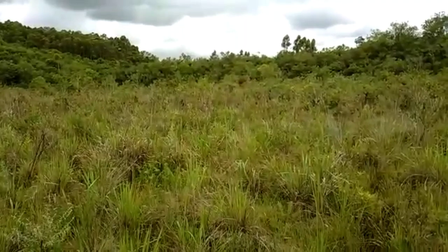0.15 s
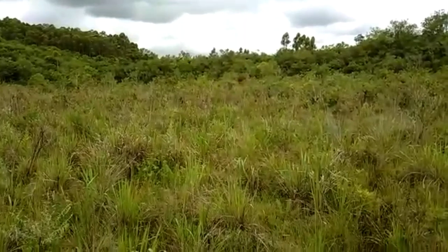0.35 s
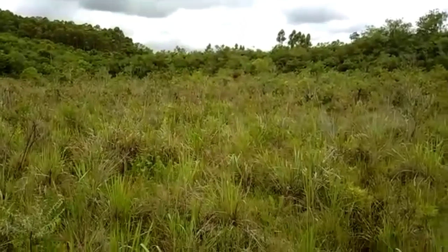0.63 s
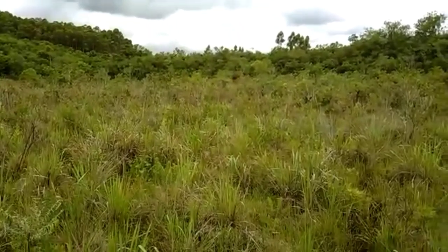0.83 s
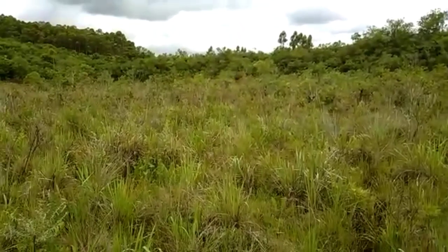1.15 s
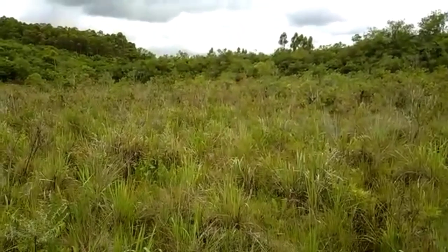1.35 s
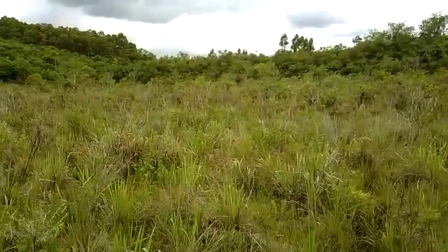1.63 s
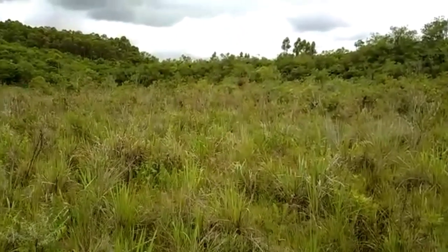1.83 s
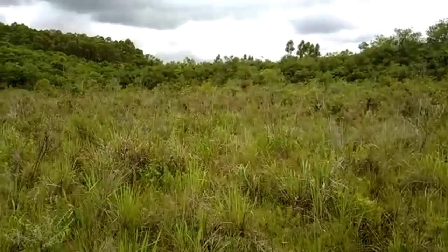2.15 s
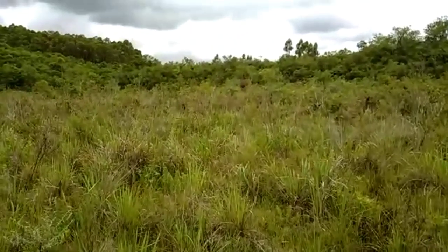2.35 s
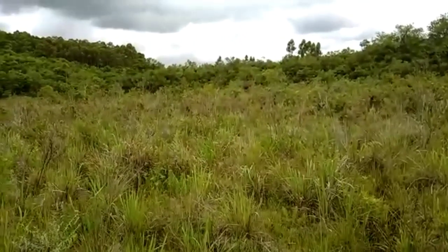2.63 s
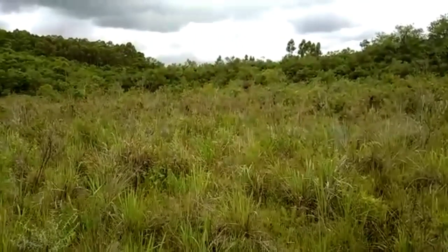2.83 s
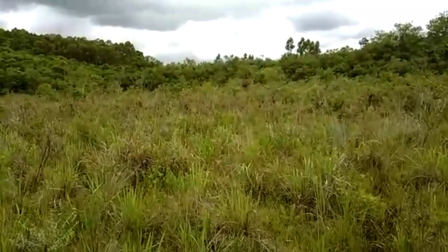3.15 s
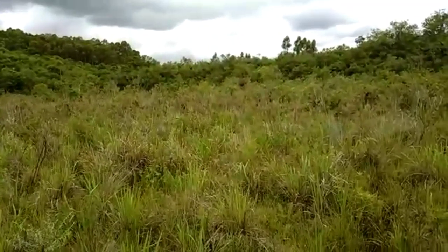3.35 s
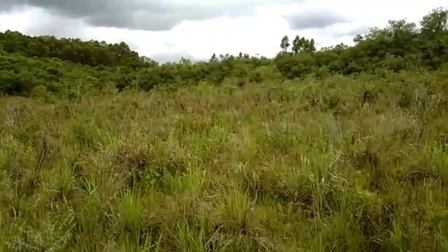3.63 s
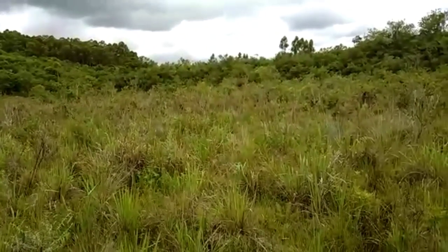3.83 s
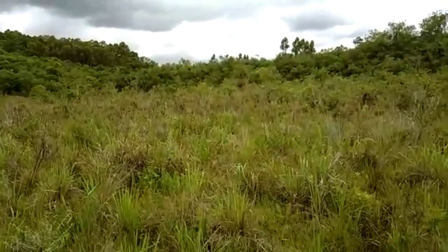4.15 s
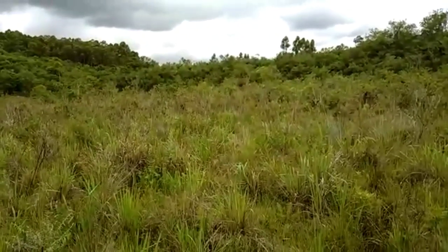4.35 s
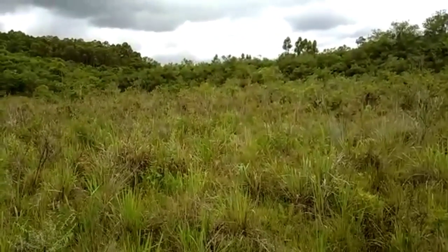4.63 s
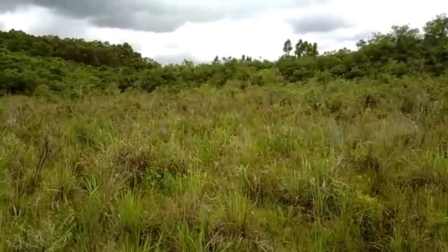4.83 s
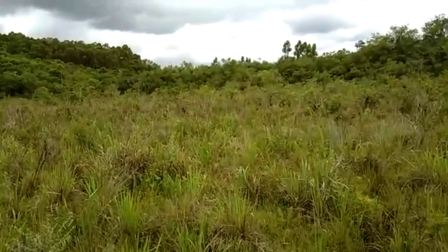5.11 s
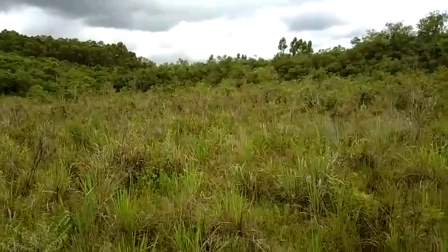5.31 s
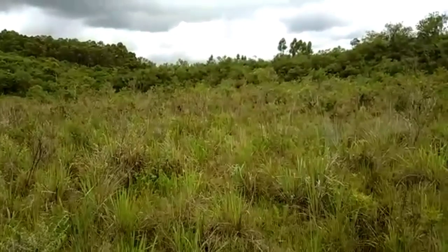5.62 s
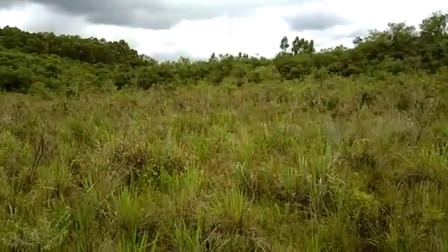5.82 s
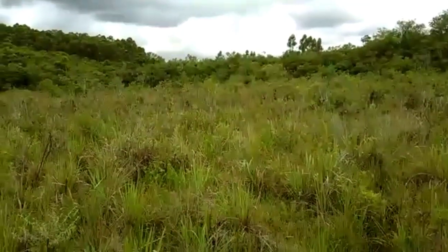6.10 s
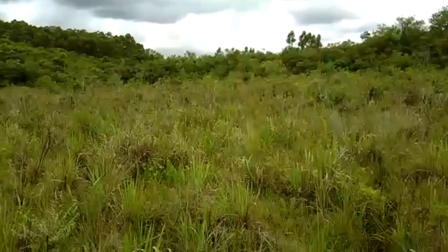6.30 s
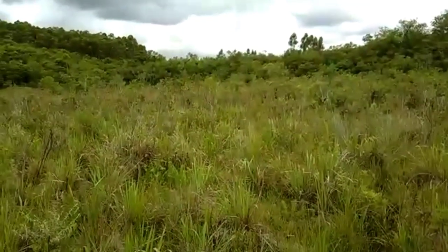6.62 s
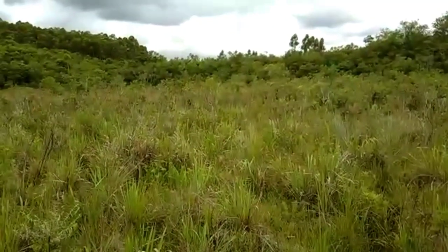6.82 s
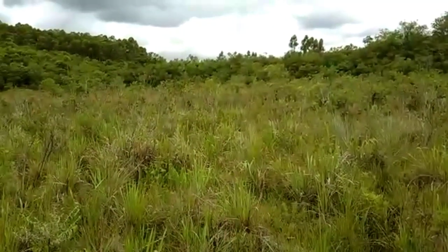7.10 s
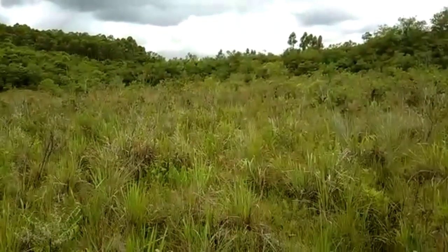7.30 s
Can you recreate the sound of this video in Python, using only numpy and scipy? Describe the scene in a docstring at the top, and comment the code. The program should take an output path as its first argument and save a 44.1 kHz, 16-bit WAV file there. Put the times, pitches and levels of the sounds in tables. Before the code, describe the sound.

Hounds bay some way off with long overlapping howls, hoarse cries and short yelps, over faint insects in an open field.

```python
"""Hounds bay some way off in a grassy valley whose wooded slopes return a faint echo.
One howl is already under way. After a second, barks and yelps open long overlapping bays, which break
into a hoarse rasp and drop in pitch as the breath runs out. After a short lull, at 4 s, come a hoarse cry
and a long howl; thinner cries follow from 6 s to the end. All along, an insect scrapes its wings nearby
in even pulses, and now and then a small bird chirps and the grass stirs."""
import sys
import numpy as np
from scipy import signal
from scipy.fft import rfft, irfft
from scipy.io import wavfile
from scipy.ndimage import uniform_filter1d

SR = 44100
rng = np.random.default_rng(int(sys.argv[2]) if len(sys.argv) > 2 else 0)


def unload_audio(sound):
    """Save the sound as a 16-bit wav file, at the path given as the first command line argument."""
    columns = np.transpose(np.atleast_2d(sound))
    # keep every value between -1 and 1, then stretch to whole-number steps
    steps = np.round(np.clip(columns, -1, 1) * 32767)
    wavfile.write(sys.argv[1], SR, steps.astype(np.int16))


N = 328986
T = np.arange(N) / SR
FREQS = np.fft.rfftfreq(N, 1 / SR)


# The long calls: (name, throat, kind of opening, start [s], end [s], opening pitch swing [Hz],
#   opening accent [dB], time the voice stays pinched [s], closing length [s], closing fall [share of
#   pitch], closing accent [dB], closing rasp over tone [dB], clear-voice rasp over tone [dB])
CALLS = [ ("first howl", "deep", "moan", -.5, 1.28, 0, 0, .01, 0.0506, .24, 4.4, -2, -34),
         ("main bay", "deep", "bark", 1.246, 3.612, -85, -1, .01, .0305, .25, -2, -2, -27),
         ("first yelp", "deep", "yelp", 1.32, 1.485, 0, 0, 0.39, 0.015, .07, -3, -1, -25),
         ("second bay", "deep", "bark", 1.738, 3.735, -105, 10.6, .01, .052, 0.604, 3, -18, -25),
         ("second cry", "shrill", "yelp", 1.926, 3.08, 22.9, .44, 0.26, .02, .08, -3, -3, -17),
         ("hoarse cry", "shrill", "yelp", 3.983, 4.9, 62, 0, 0.14, .01, .04, 0, 0, -29),
         ("long howl", "deep", "moan", 4.224, 6.348, -62, 6.5, .01, 0.033, .13, 0, 3, -28.5),
         ("thin cry", "shrill", "yelp", 5.975, 7.6, 48.1, 5.3, 0.31, .01, .04, 0, 0, -23),
         ("rising cry", "shrill", "moan", 6.412, 7.11, 0, 0, .01, .01, .04, 0, 0, -17),
         ("gruff cry", "shrill", "moan", 7.24, 7.6, 0, 1, .01, .01, .04, 0, 0, -7),
         ("last howl", "deep", "yelp", 7.195, 7.42, -12, 0, 0.34, .03, .12, -3, -10, -13.5), ]
# The tone carries little below its lowest note or above its top resonance: (frequency [Hz], gain [dB])
TONE_FILTER = [(150, -10), (330, -10), (430, 0.5), (1900, 0.5), (2250, -0.5), (2700, -14)]
def hound(throat):
    """All calls of the "deep" or "shrill" hound: a clear tone, plus pulses that ring in its throat."""
    tone, pulses = sum(howl(call) for call in CALLS if call[1] == throat)
    pulses = pulses + rattles(throat)
    if throat == "shrill":
        pulses = pulses + voice_cracks()
    return equalise(tone, TONE_FILTER) + throat_rasp(pulses, throat)


# Harmonics 1-6 (whole multiples of the pitch) of an open bark, a round howl, a pinched yelp: (level [dB])
BARK_DB = [-14, 1, -9.5, -11, -23, -38]
HOWL_DB = [-9.5, 2.5, -22.5, -32.5, -75, -30]
YELP_DB = [2, -15, -15, -17, -33, -46]
# The mouth shifts, and its resonance lifts or drops the harmonic that lies in it:
# (call, time [s], half length [s], resonance [Hz], lift [dB])
MOUTH_SHIFTS = [("first howl", 0.53, 0.4, 1330, 3.8), ("first yelp", 1.365, .035, 1520, 7.6),
                ("first yelp", 1.408, .035, 2350, 23.7), ("second cry", 2.018, 0.025, 1400, 15),
                ("second cry", 2.02, 0.023, 2340, 14), ("second cry", 2.13, 0.15, 1980, 7.9),
                ("second cry", 2.64, 0.16, 1980, 16), ("main bay", 3.47, 0.078, 1400, 9.3),
                ("second bay", 3.62, 0.11, 1780, 21), ("hoarse cry", 4.025, 0.031, 1380, 13),
                ("long howl", 5.4, .5, 440, -3), ("thin cry", 6.003, 0.027, 1380, 12.3),
                ("thin cry", 5.995, .02, 1850, 7.9), ("thin cry", 6.754, 0.49, 1380, 19.6),
                ("thin cry", 7.28, 0.23, 1400, 10)]
# How uneven the rasp's slaps are, by throat: (slow wander [gaps], jitter [gaps], strength spread [0-1])
SLAP_UNEVENNESS = {"deep": (0.051, 0.031, 0.26), "shrill": (.03, .012, 0.16)}
def howl(call, quaver_hz=8.6, crest_s=2.29, mouth_width_hz=290, cycles_per_slap=2.5, edge_s=.0099):
    """One call as two rows: a tone, and a rasp of uneven slaps, one every second or third cycle."""
    name, throat, _, start, end, *_ = call
    sounding = gate(max(start, edge_s / 2), min(end, T[-1] - edge_s / 2), edge_s)
    on = sounding > 0
    t, tone, out = T[on], 0, np.zeros((2, N))
    pitch, tone_db, rasp_db, voice = call_shape(call, t)
    hoarse = 1 / (1 + from_db(tone_db - rasp_db))   # the rasp's share also shakes pitch and level
    waver = .004 * drift(35, t)
    quaver = .026 * np.cos(2 * np.pi * quaver_hz * (t - crest_s))
    shake = quaver + .012 * drift(130, t) + .012 * drift(14, t)
    cycles = np.cumsum(pitch * (1 + waver + hoarse * shake)) / SR
    for k, levels_db in enumerate(zip(BARK_DB, HOWL_DB, YELP_DB), 1):
        flicker_db = 1.5 * (drift(45, t) + drift(7, t)) * (k > 2)   # high harmonics are less steady
        if k == 1:   # the lowest one sways, and weakens as the voice gets hoarse
            flicker_db = 1.5 * drift(9, t) - .5 * hoarse
        lift_db = sum(db * bump(t, s, length) * bump(k * pitch, hz, mouth_width_hz)
                      for who, s, length, hz, db in MOUTH_SHIFTS if who == name)
        strength = np.interp(voice, [-1, 0, 1], from_db(levels_db))
        tone = tone + strength * from_db(flicker_db + lift_db) * np.cos(2 * np.pi * k * cycles)
    out[0, on] = tone * from_db(tone_db + .7 * drift(18, t) + 3.5 * hoarse * drift(110, t))
    wander, jitter, spread = SLAP_UNEVENNESS[throat]
    slaps = cycles / cycles_per_slap
    slaps = slaps + .13 * np.cos(np.pi * slaps)   # short and long gaps take turns
    slaps = slaps + wander * drift(40, t) + jitter * drift(170, t)
    out[1, on] = fold_clicks(slaps, spread) * from_db(rasp_db)
    return sounding * out


# Ways to open a call: (time of widest swing [s], half length [s], open muzzle [0-1], rasp over tone [dB])
OPENINGS = {"bark": (.004, .045, .85, -4), "moan": (.02, .032, .5, -8), "yelp": (.012, .03, 0, -25)}
# The held part of each call: (time [s], pitch [Hz], effort [dB])
HELD_NOTES = { "first howl": [(0, 446.6, -37.5), (.18, 437, -39.5), (.28, 446.7, -37.5), (.65, 456.5, -38),
              (1.0, 457, -40), (1.17, 458, -42), (1.22, 457.4, -44.5)], "main bay": [(1.28, 444.3, -35),
              (1.35, 441, -33), (1.4, 449, -33), (1.44, 456.1, -31.5), (1.7, 444.1, -34),
              (1.85, 449.8, -32), (2.21, 457.4, -31.5), (2.4, 463.6, -27.5), (2.85, 463.4, -29.5),
              (3.36, 467.1, -29), (3.45, 455.8, -34), (3.56, 442.7, -35)],
              "first yelp": [(1.325, 489.4, -38), (1.35, 516.4, -35.5), (1.38, 496, -29.5),
              (1.405, 470, -34.5), (1.435, 451, -35), (1.47, 483, -36)], "second bay": [(1.79, 440, -42.5),
              (1.85, 431.1, -42), (2.05, 433, -34.5), (2.28, 444, -36), (2.48, 432, -41),
              (2.74, 434.1, -37.5), (2.87, 456.2, -39), (3.42, 465, -36.5), (3.53, 458, -40.5),
              (3.62, 438, -45)], "second cry": [(1.95, 483.8, -31), (1.985, 478.2, -31), (2.05, 459, -34),
              (2.11, 497, -32.5), (2.16, 493.4, -29.5), (2.2, 474, -34), (2.27, 472, -37),
              (2.65, 476.9, -35), (2.75, 480.2, -38), (2.82, 501, -37.5), (3.02, 500, -39),
              (3.07, 480, -46)], "hoarse cry": [(4.0, 425, -38), (4.066, 422.5, -38), (4.12, 438.3, -36),
              (4.165, 478, -36.5), (4.24, 502, -36.5), (4.33, 470, -41.5), (4.62, 467.8, -43),
              (4.89, 451, -47.5)], "long howl": [(4.28, 426.4, -36), (4.45, 433, -36), (4.6, 446, -32.5),
              (4.75, 435.8, -36.5), (5.03, 431.3, -37.5), (5.26, 443.4, -35.5), (5.47, 450.8, -35),
              (5.7, 444.7, -36.5), (6.22, 441.8, -35), (6.32, 449.2, -36)], "thin cry": [(6.04, 417, -42),
              (6.2, 441.6, -40.5), (6.39, 447, -42.5), (6.47, 449, -54), (6.6, 452, -55),
              (6.85, 457.3, -50), (7.04, 468, -46.5), (7.2, 457, -45), (7.33, 464, -48), (7.46, 461, -49)],
              "rising cry": [(6.42, 444.8, -41), (6.47, 472, -40.5), (6.52, 503, -37.5),
              (6.575, 514, -38.5), (6.62, 526.4, -46), (6.69, 531, -46), (6.76, 506, -58), (6.83, 485, -41),
              (6.9, 475, -42), (6.96, 453, -44), (7.1, 447, -48.5)], "gruff cry": [(7.25, 470, -43),
              (7.35, 514, -41.5), (7.46, 531, -41.5)], "last howl": [(7.21, 451.7, -43.5),
              (7.28, 463.7, -43), (7.35, 470, -40), (7.4, 468, -45)], }
# Spells when the voice breaks into a rasp: (call, start [s], end [s], rasp over tone [dB])
HOARSE_SPELLS = [("first howl", -.1, 0.291, -21), ("first yelp", 1.32, 1.365, -4.5),
                 ("main bay", 1.413, 1.7, -7.5), ("main bay", 2.222, 3.42, -5.5),
                 ("second cry", 2.24, 3.1, -3), ("second bay", 2.4, 3.1, -8), ("second bay", 3.1, 3.45, 1),
                 ("hoarse cry", 4.168, 4.9, 4), ("long howl", 4.225, 4.275, -5),
                 ("long howl", 4.325, 4.815, -4), ("rising cry", 6.415, 7.11, 0),
                 ("gruff cry", 7.245, 7.6, 5.4)]
# How pinched each call stays while held: (pinch [0 round howl, 1 yelp])
HELD_PINCH = {"first howl": 0.12, "main bay": 0.082, "first yelp": .07, "second bay": .14, "second cry": .2,
              "hoarse cry": .2, "long howl": 0.018, "thin cry": 0.38, "rising cry": .12, "gruff cry": 0.33,
              "last howl": .07}
def call_shape(call, t, break_db=-12, jump_hz=21, jump_db=2.16, attack_s=.016):
    """How a call opens, holds and closes: pitch, tone level, rasp level, voice (-1 bark, 0 howl, 1 yelp)."""
    name, _, kind, start, end, swing_hz, accent_db, pinch_s = call[:8]
    close_s, close_fall, close_db, close_rasp_db, clear_rasp_db = call[8:]
    swing_at, swing_s, muzzle, opening_rasp_db = OPENINGS[kind]
    times, held_hz, effort_db = np.transpose(HELD_NOTES[name])
    age = t - start
    opening = bump(age, swing_at, swing_s)
    closing = np.clip(1 + (t - end) / close_s, 0, 1)
    slack = np.minimum(3 * closing, 1)
    spells = sum(from_db(db) * gate(a, b, edge=.016, t=t)
                 for who, a, b, db in HOARSE_SPELLS if who == name)
    # Once the rasp passes break_db, the voice jumps up and gets louder.
    broken = spells ** 2 / (spells ** 2 + from_db(break_db) ** 2)
    pitch = np.interp(t, times, held_hz) + swing_hz * opening + jump_hz * broken
    pitch = pitch * (1 - close_fall * closing ** 2)
    onset_db = accent_db * bump(age, .034, .018) - 13 * np.maximum(1 - age / attack_s, 0)
    ending_db = close_db * slack - 11.5 * closing ** 3   # the voice fades as its pitch drops
    level_db = np.interp(t, times, effort_db) + jump_db * broken + onset_db + ending_db
    rasp = from_db(clear_rasp_db) + from_db(opening_rasp_db) * opening + from_db(close_rasp_db) * slack
    rasp = np.maximum(spells, rasp)
    tone_db = level_db - 10 * np.log10(1 + rasp ** 2)   # tone and rasp share the effort
    pinch = np.maximum(HELD_PINCH[name] * (1 - broken / 2), np.exp(-(age / pinch_s) ** 4))
    gape = np.clip(muzzle * (opening + slack), 0, 1)
    return pitch, tone_db, tone_db + 20 * np.log10(rasp), pinch * (1 - gape) - gape


# Throat and open muzzle of each hound when hoarse: (frequency [Hz], relative level [dB])
THROATS = { "deep": [(100, -46), (185, -33), (250, -20), (300, -28.5), (345, -29.5), (460, -4), (560, -10),
           (675, 2), (810, -7.5), (960, -1), (1120, 1), (1260, -12.5), (1450, -15.5), (1700, -25.5),
           (1950, -19), (2300, -49)], "shrill": [(100, -41.5), (260, -18), (360, -27.5), (470, -10.5),
           (610, -2), (790, -20.5), (950, -2), (1080, 2), (1200, -0.5), (1280, -15), (1380, -12),
           (1600, -21.5), (1970, -13), (2270, -46), (4000, -50)], }
# The high part of the rasp: (frequency [Hz], gain [dB])
TREBLE_BAND = [(1300, -30), (1700, 0.5)]
# How that part rises and falls: (time [s], gain [dB])
TREBLE_LEVEL = [(0, 1), (1.5, -2), (2.3, -0.5), (2.45, 0), (2.62, 3.5), (2.78, -4), (2.95, -7), (3.35, -2),
                (4.25, -3), (4.8, -2.5), (5.3, -1), (6.45, -1), (6.7, 1), (6.92, 2), (7.4, -2)]
def throat_rasp(pulses, throat):
    """Each pulse rings in the throat and muzzle; the rasp grows brighter and duller over time."""
    rasp = colour(pulses, THROATS[throat])
    return rasp + equalise(rasp, TREBLE_BAND) * (from_db(at_time(TREBLE_LEVEL)) - 1)


# Rattles: (throat, start [s], end [s], first rate [1/s], last rate [1/s], limp [gaps], level [dB])
RATTLES = [("deep", 0, .12, 151, 148, 0, -45), ("shrill", 6.585, 6.715, 180, 184, .09, -40.5),
           ("shrill", 6.71, 6.815, 151.5, 150.5, 0, -40.5)]
def rattles(throat):
    """The vocal folds lock into a slow, regular rattle; a limp makes its gaps short and long in turn."""
    out = 0
    for who, start, end, first_rate, last_rate, limp, db in RATTLES:
        if who == throat:
            cycles = np.cumsum(np.interp(T, [start, end], [first_rate, last_rate])) / SR
            clicks = fold_clicks(cycles + limp * np.cos(np.pi * cycles), uneven=.036)
            out = out + from_db(db) * gate(start, end, edge=.013) * clicks
    return out


# Cracks in the shrill voice: (start [s], end [s], level [dB])
CRACKS = [(4.83, 4.882, -44), (4.915, 4.963, -45), (4.98, 5.017, -46), (5.06, 5.097, -47),
          (5.135, 5.156, -45), (5.225, 5.239, -43.5), (5.305, 5.32, -50), (5.385, 5.405, -50),
          (7.066, 7.08, -48.5), (7.118, 7.13, -43.5)]
def voice_cracks(clicks_per_s=215):
    """The voice cracks for a moment into ragged clicks."""
    cracking = sum(from_db(db) * gate(start, end, edge=.0086) for start, end, db in CRACKS)
    return cracking * fold_clicks(T * clicks_per_s + .169 * drift(150), uneven=.57)


def fold_clicks(cycles, uneven):
    """The vocal folds snap shut: one click per cycle, each with its own strength."""
    at = np.flatnonzero(np.diff(np.floor(cycles)) > 0)
    clicks = np.zeros(len(cycles))
    clicks[at] = 1 + uneven * (rng.exponential(size=8192)[:len(at)] - 1)
    return rms_one(clicks)


# Short yips and barks: (start [s], end [s], first pitch [Hz], last pitch [Hz], first mouth resonance [Hz],
#   last mouth resonance [Hz], chest tone against that resonance [dB], roughness [0-1], level [dB])
YIPS = [ (.325, .4, 468, 449, 1750, 1850, -16, .9, -60), (.932, .975, 489, 440, 1950, 1750, -16, 0.55, -62),
        (1.228, 1.261, 476, 446, 1450, 1350, 1, 0.34, -39),
        (1.254, 1.296, 362.4, 398, 1100, 1190, -18.5, 0.3, -34.5),
        (1.466, 1.54, 652, 567, 1330, 1170, -5, .15, -40.5),
        (1.543, 1.574, 362.6, 334, 720, 680, -24, 0.3, -34.5),
        (1.56, 1.619, 299, 160, 300, 150, 0, .5, -59), (1.75, 1.79, 334, 392, 1330, 1530, -21, .2, -38),
        (3.108, 3.152, 1055, 916, 1550, 1900, 6, .1, -26.5),
        (3.148, 3.191, 899.6, 832, 1740, 1590, 9, .35, -31.5),
        (3.146, 3.213, 546, 387, 1640, 1160, -9, .5, -38.5),
        (3.583, 3.61, 405.4, 335, 1230, 1020, -12, .15, -38.5),
        (5.495, 5.536, 390, 361.7, 400, 350, 0, .4, -55), (7.15, 7.18, 590, 547, 1750, 1797, 10, 0.66, -32),
        (7.172, 7.205, 808, 784, 1620, 1600, 0, .5, -38), ]
def yip(row, mouth_width_hz=380, edge_s=.011):
    """Sliding harmonics pass through a moving mouth; roughness shakes them and adds tones in between."""
    start, end, first_hz, last_hz, mouth_from_hz, mouth_to_hz, chest_db, rough, db = row
    on = (T > start) & (T < end)
    t, tone, out = T[on], 0, np.zeros(N)
    along = (t - start) / (end - start)
    pitch = first_hz + (last_hz - first_hz) * along ** 1.61   # slides ever faster
    mouth_hz = mouth_from_hz + (mouth_to_hz - mouth_from_hz) * along
    cycles = np.cumsum(pitch * (1 + rough * .073 * drift(500, t))) / SR
    for k in range(1, 7):
        gain = 1 / (1 + (2 * (k * pitch - mouth_hz) / mouth_width_hz) ** 2) ** 1.33
        growl = 1 + rough * .64 * drift(150, t) * np.cos(np.pi * cycles)   # at half the pitch
        tone = tone + (gain * growl + from_db(chest_db) * (k == 1)) * np.cos(2 * np.pi * k * cycles)
    envelope = np.sin(np.pi / 2 * np.minimum(np.minimum(t - start, end - t) / edge_s, 1))
    shimmer = from_db(rough * 5 * drift(250, t))
    out[on] = from_db(db) * envelope * rms_one(tone * shimmer)
    return out


# Where the pack is: (time [s], left over right [dB])
BEARING = [(0, 7), (1.85, 5), (2.8, 5), (4.0, 4.5), (4.9, 2), (5.88, 0), (6.13, 3), (7.46, 4.5)]
# How much of that left-right contrast is kept: (frequency [Hz], gain [dB])
SHADE = [(450, -7), (900, 1)]
# How late the sound reaches the left side: (time [s], delay [s])
LEFT_DELAY = [(0, 0), (2.7, 0.00012), (3.3, 0.00011), (4.2, 0.00011), (4.7, 0.000042), (6.9, 0),
              (7.3, 0.00012)]
def direction(x):
    """Sound from one side reaches left and right at unequal times and, mostly in the treble, levels."""
    left, right = x * pan(at_time(BEARING))
    mid = (left + right) / 2
    side = equalise((left - right) / 2, SHADE)
    late_left = np.interp(T - at_time(LEFT_DELAY), T, mid + side)
    return np.array([late_left, mid - side])


def valley_echo(x, bush_db=-17, bush_fade_s=.12, slope_db=-23, slope_fade_s=2.6, slope_delay_s=.16):
    """Nearby bushes scatter the calls; the far slopes send back a long, faint wash."""
    t = T[:2 * SR]
    near, far = rng.standard_normal((2, 2, len(t)))
    near = near * from_db(-60 * t / bush_fade_s) * (t > .004)
    far = far * from_db(-60 * t / slope_fade_s) * (t > slope_delay_s)
    response = (from_db(bush_db) * rms_one(near) + from_db(slope_db) * rms_one(far)) / np.sqrt(len(t))
    return signal.fftconvolve(x[None], response, axes=1)[:, :N]


# Runs of even wing strokes: (first stroke [s], end [s], time between strokes [s], level [dB])
INSECT_RUNS = [(.2, .8, 0.23, -69), (1.05, 2.2, 0.3, -66), (2.352, 3.5, .254, -57),
               (3.629, 4.62, 0.2244, -61), (4.736, 7.5, 0.24, -57)]
# Where the wings ring: (frequency [Hz], width [Hz], relative level [dB])
WINGS = [(4830, 430, 1), (9740, 780, -7.5), (14050, 900, -13)]
def near_insect(stroke_s=.18, teeth_per_s=113):
    """An insect scrapes its wings in pulses; tiny teeth make each stroke buzz."""
    strokes = sum(from_db(db) * gate(s - stroke_s / 2, s + stroke_s / 2, edge=.065)
                  for first, end, period, db in INSECT_RUNS for s in np.arange(first, end, period))
    teeth = 1 + .38 * np.sin(2 * np.pi * teeth_per_s * T + 1.6 * drift(40))
    return strokes * resonate(rng.standard_normal((2, N)) * teeth, WINGS) * pan(db=6)


# The far insects' high bands: (frequency [Hz], width [Hz], relative level [dB])
TRILL = [(8130, 140, -0.5), (8330, 340, 0.5)]
def far_insects(level_db=-67):
    """Other insects trill steadily far away."""
    return from_db(level_db) * resonate(rng.standard_normal((2, N)), TRILL)


# Chirps: (start [s], end [s], first pitch [Hz], last pitch [Hz], level [dB])
CHIRPS = [(.33, 0.598, 3950, 4120, -69), (.8, 0.992, 5030, 4960, -67), (1.85, 2.0, 4945, 5600, -60.5),
          (4.74, 4.871, 5120, 5530, -59.5), (4.8, 5.146, 4780, 4740, -58)]
def bird(flutter_db=3):
    """A small bird whistles thin, gliding notes with a quiver."""
    out, quiver = 0, 1 + .007 * drift(220)
    for start, end, first_hz, last_hz, db in CHIRPS:
        hz = np.interp(T, [start, end], [first_hz, last_hz]) * quiver
        out = out + from_db(db) * gate(start, end, edge=.05) * np.sin(2 * np.pi * np.cumsum(hz) / SR)
    return out * from_db(flutter_db * drift(70))


# The low rumble and the soft rush of air over the field: (frequency [Hz], relative level [dB])
AIR_RUMBLE = [(18, -34), (30, -22), (42, -8), (60, 5.5), (85, -4.5), (120, -7), (170, -26), (400, -50),
              (2000, -72)]
AIR_RUSH = [(25, -33), (120, -9.5), (300, -13.5), (900, -6.5), (2000, -14.5), (3000, -26), (6000, -35)]
def air(rumble_db=-63.5, rush_db=-60, puff_at_s=1.12, puff_db=13):
    """Moving air rumbles, with one puff, under a steady rush."""
    swell_db = 2.5 * drift(8) + puff_db * bump(T, puff_at_s, .074)
    rumble = from_db(rumble_db + swell_db) * stereo_noise(AIR_RUMBLE)
    return (rumble + from_db(rush_db) * stereo_noise(AIR_RUSH)) * pan(db=-1.1)


# Moments when the grass stirs: (time [s], half length [s], level [dB])
BRUSHES = [(0.367, 0.044, -64), (.95, .025, -62), (3.144, 0.042, -58), (5.221, 0.08, -56.5),
           (7.204, 0.043, -57)]
# The sound of the stalks: (frequency [Hz], relative level [dB])
STALK_COLOUR = [(600, -24), (1600, 9), (3000, -4.5), (6500, 2), (10000, -4), (15000, -26)]
def grass(flicker_db=3):
    """Stalks brush together close by in short rustles."""
    brushing = sum(from_db(db) * bump(T, s, length) for s, length, db in BRUSHES)
    return brushing * from_db(flicker_db * drift(300)) * stereo_noise(STALK_COLOUR) * pan(db=1)


# A fine hiss: (frequency [Hz], relative level [dB])
HISS_COLOUR = [(1000, 6.5), (2500, 1.5), (3800, 0.5), (4700, 5.5), (6000, 3), (7500, -3.5), (9000, -8),
               (11000, -4), (13000, -10.5), (15500, -8)]
def hiss(dogs, rest_db=-62, swell_db=-57, follow=.41):
    """A hiss that swells with the loudness of the calls."""
    power = uniform_filter1d(rms_one(dogs) ** 2, size=SR // 20)
    loudness = np.sqrt(np.abs(power) + 1e-12)
    swell = from_db(swell_db) * (loudness / loudness.mean()) ** follow
    flicker = from_db(1.26 * drift(200))
    return np.hypot(from_db(rest_db), swell) * flicker * stereo_noise(HISS_COLOUR) * pan(db=.5)


# How alike the background is on the left and right: (frequency [Hz], likeness [0-1])
LIKENESS = [(30, 0.51), (130, 0.8), (500, 0.54), (2000, 0.083), (5000, 0), (15000, 0)]
def stereo_noise(spectrum):
    """Shaped noise whose two sides are more alike in the bass than in the treble."""
    alike = np.clip(at_hz(LIKENESS), -1, 1)
    mid, side = rfft(rng.standard_normal((2, N)))
    noise = irfft(np.sqrt(1 + alike) * mid + np.sqrt(1 - alike) * side * [[1], [-1]], N)
    return rms_one(colour(noise, spectrum))


def colour(x, spectrum):
    """Filter by a (frequency [Hz], level [dB]) table so each click rings after it strikes (minimum phase)."""
    cepstrum = irfft(np.log(rms_one(from_db(at_hz(spectrum)))), N)
    cepstrum[1:N // 2] *= 2
    cepstrum[N // 2 + 1:] = 0
    return irfft(rfft(x) * np.exp(rfft(cepstrum)), N)


def equalise(x, gains):
    """Turn each frequency up or down by a (frequency [Hz], gain [dB]) table."""
    return irfft(rfft(x) * from_db(at_hz(gains)), N)


def resonate(x, modes):
    """Let a sound ring in several narrow bands at once; the result has strength 1."""
    gain = sum(from_db(db) / (1 + 2j * (FREQS - hz) / width) ** 2 for hz, width, db in modes)
    return rms_one(irfft(rfft(x) * gain, N))


def at_hz(points):
    """Read a table at every frequency, along a log axis."""
    hz, value = np.transpose(points)
    return np.interp(np.log(FREQS + 1), np.log(hz), value)


def at_time(points):
    """Read a table at every moment."""
    return np.interp(T, *np.transpose(points))


def drift(rate, t=T):
    """A random wander of typical size 1 that turns about rate times a second."""
    knots = rng.standard_normal(4096)
    return np.interp(t * rate, np.arange(len(knots)), knots) / np.sqrt(2 / 3)


def gate(start, end, edge, t=T):
    """One between start and end, with soft edges."""
    return np.clip(np.minimum(t - start, end - t) / edge + .5, 0, 1)


def bump(t, middle, width):
    """A smooth hill of height 1."""
    return np.exp(-((t - middle) / width) ** 2)


def pan(db):
    """Left and right gains, with the left louder by db."""
    return from_db(np.array([[.5], [-.5]]) * db)


def from_db(db):
    """Turn decibels into a gain."""
    return 10 ** (np.asarray(db) / 20)


def rms_one(x):
    """Scale to an average strength (rms) of 1."""
    return x / np.sqrt(np.mean(x ** 2) + 1e-20)


def scene():
    """The pack in its valley, with the small life of the field."""
    dogs = hound("deep") + hound("shrill") + sum(yip(row) for row in YIPS)
    pack = direction(dogs) + valley_echo(dogs)
    return pack + near_insect() + far_insects() + bird() + air() + grass() + hiss(dogs)


def record(dry, sheen_db=(-34.5, -39.5, -44, -45.5), mirror_hz=3891, cutoff_hz=15750):
    """Add a faint metallic sheen, the sound mirrored about multiples of one frequency; cut the very top."""
    sheen = sum(from_db(db) * 2 * np.cos(2 * np.pi * k * mirror_hz * T)
                for k, db in enumerate(sheen_db, 1))
    return irfft(rfft(dry * (1 + sheen)) / (1 + (FREQS / cutoff_hz) ** 400), N)


dry = scene()
out = record(dry)
unload_audio(out)
```